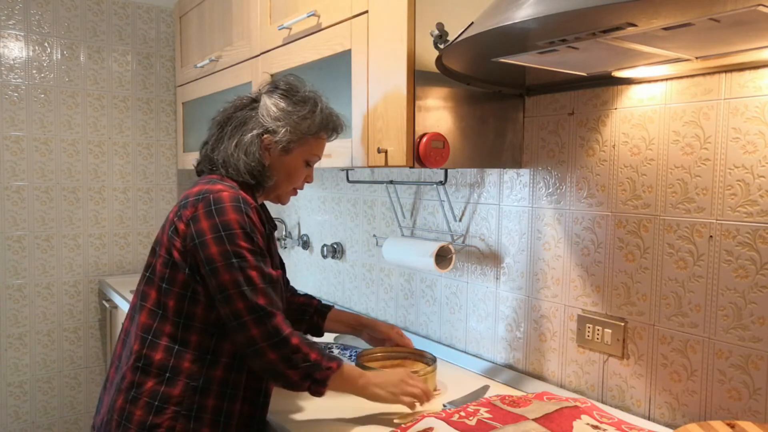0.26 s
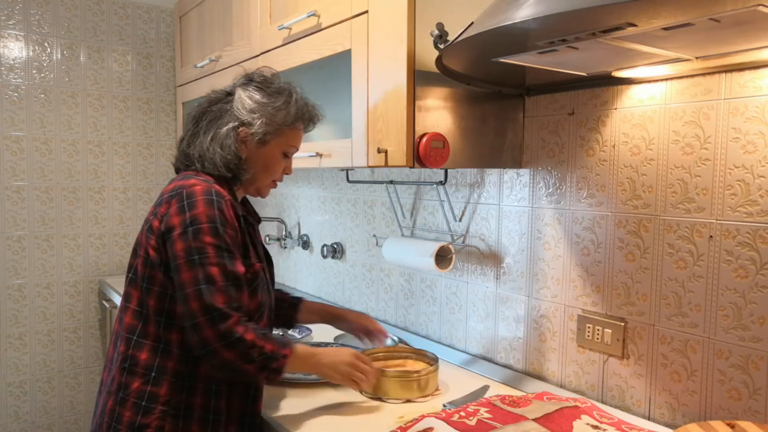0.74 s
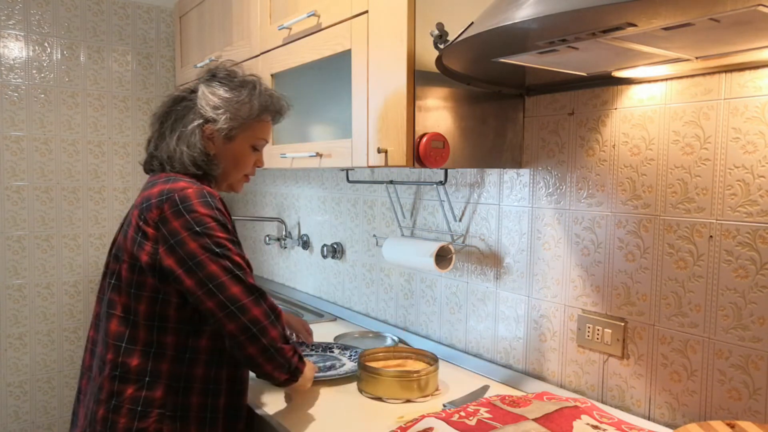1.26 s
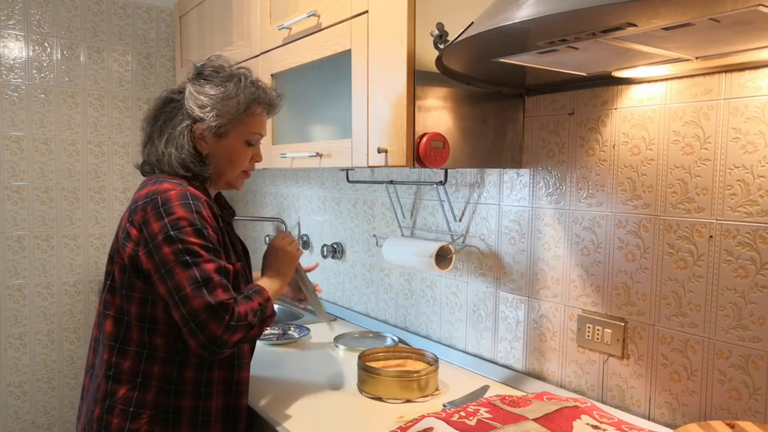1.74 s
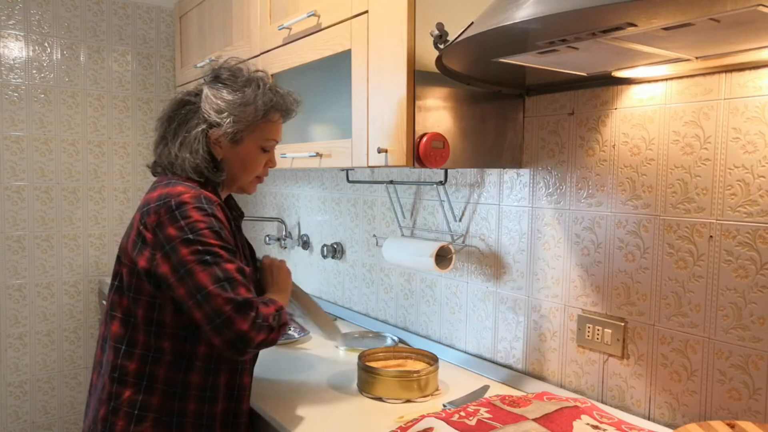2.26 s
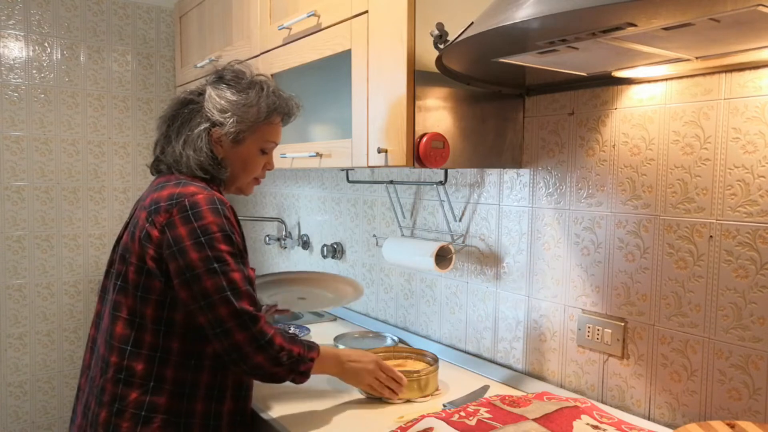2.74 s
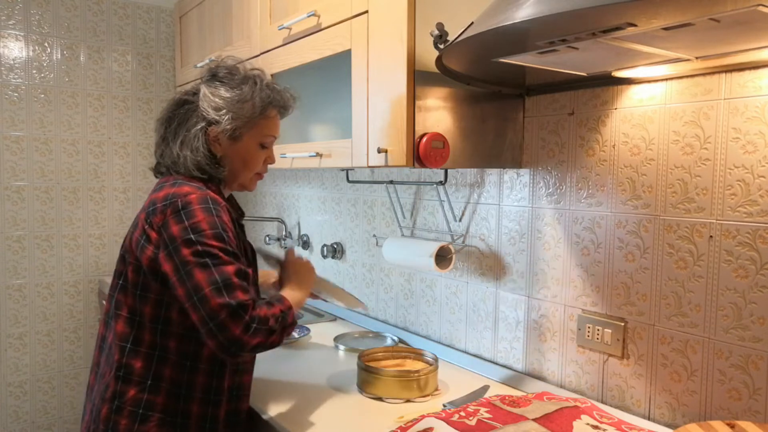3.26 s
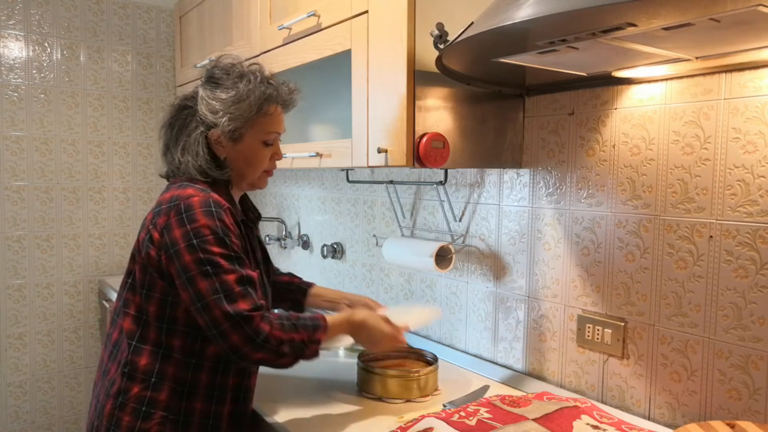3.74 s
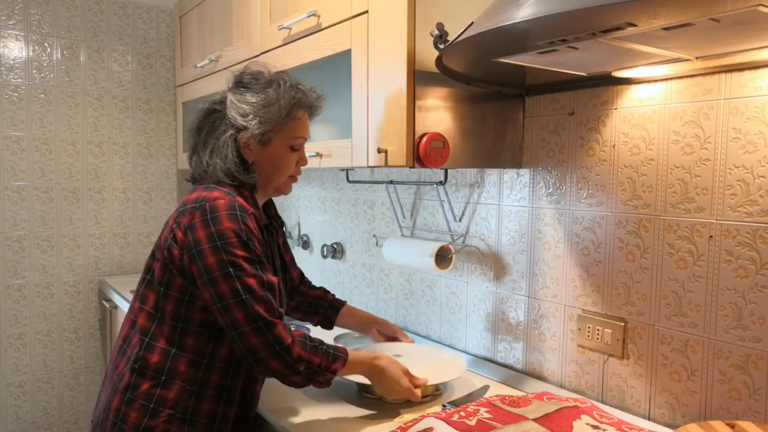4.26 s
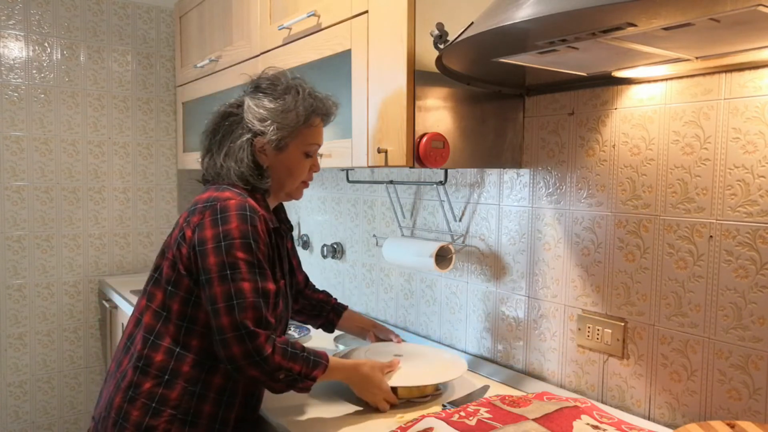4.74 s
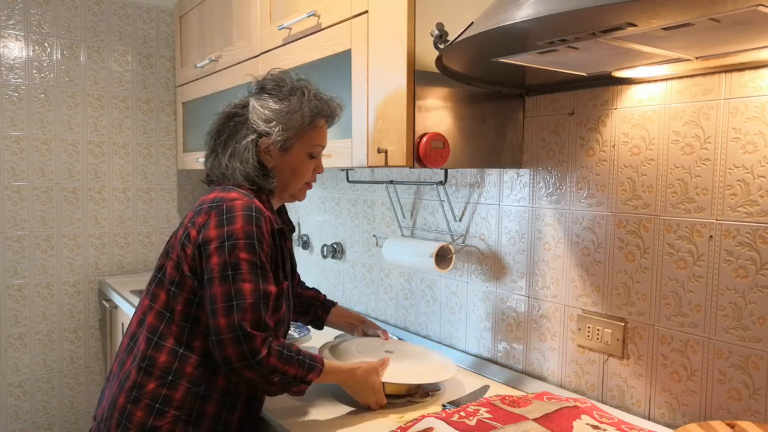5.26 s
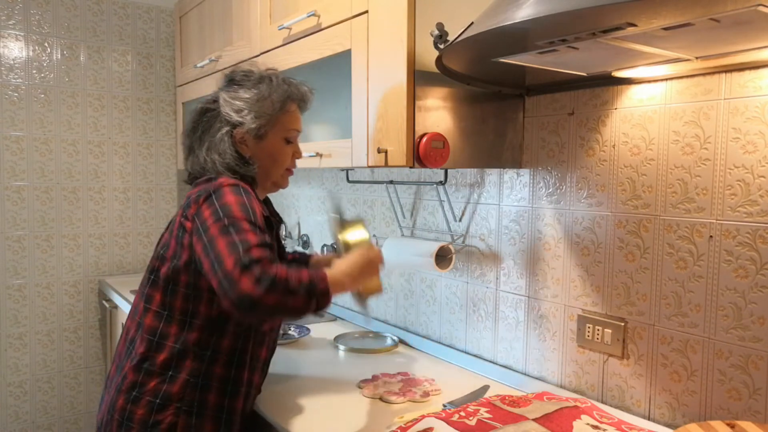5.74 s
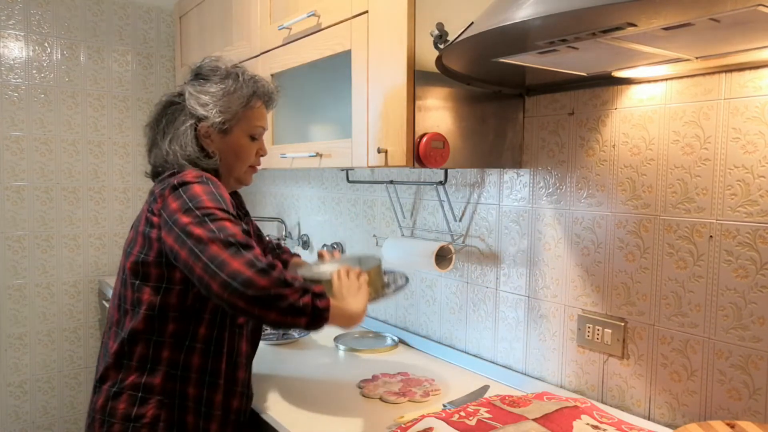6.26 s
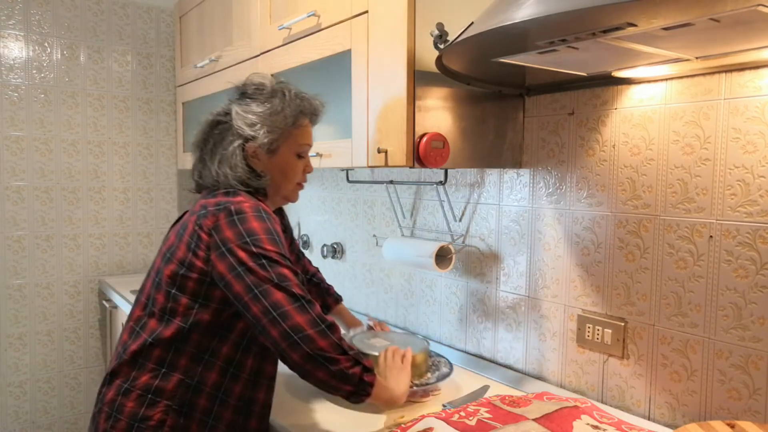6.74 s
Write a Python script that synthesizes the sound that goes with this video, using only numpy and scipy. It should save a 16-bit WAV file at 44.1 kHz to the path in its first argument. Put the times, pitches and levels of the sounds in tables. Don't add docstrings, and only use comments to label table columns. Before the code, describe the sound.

A small tiled kitchen, picked up by two spaced microphones, with faint house rumble, soft street wash and a little hiss beneath. At 0 s a tin mould knocks the counter in a tight metallic rattle, repeated at 0.2 s; faint clicks follow at 0.5-0.9 s. From about 1 s glazed ceramic rubs in short gritty pulls, rising into a loud, hard plate clack at 1.45 s with small ringing rebounds until 1.75 s. From 1.8 to 3.4 s only very light ceramic touches ring. At 4.2-4.3 s the plate seats on the mould with two dull clanks and a low cabinet boom, then a dry knock near 4.5 s. Finger clicks come at 5.03 s, a bright knock at 5.4 s, a snapping rattle at 5.6 s, handling knocks at 5.8 and 6.15 s, a ringing clunk at 6.37 s, a click at 6.65 s. A hard landing strikes at 7 s, where it ends.

```python
import sys
import numpy as np
from scipy import signal
from scipy.io import wavfile
from scipy.ndimage import uniform_filter1d

SR = 44100
rng = np.random.default_rng(int(sys.argv[2]) if len(sys.argv) > 2 else 0)


def voltage_ratio(level):
    return 10 ** (np.asarray(level, float) / 20)


def transcribe(u):
    v = np.clip(np.atleast_2d(u).T, -1, 1)
    q = np.round(v * 32767).astype(np.int16)
    wavfile.write(sys.argv[1], SR, q)


N = 308700

# start in seconds, blow level in dB, hardness (above 4 kHz) in dB, ring level in dB,
# share of the ring time [ratio] left by the hand.
TIN_HITS = [
    (0.001, -21.5, -15, -12, 0.16),
    (0.044, -23, -0.5, 0.5, 0.24),
    (0.069, -23.5, -43, -22, 0.31),
    (0.105, -25, -10, -24, 0.74),
    (0.132, -42, -12, -7, .4),
    (.19, -26.5, -13, -3, 0.69),
    (0.201, -22, -6, 1.5, 0.17),
    (0.216, -25.5, -12, -14.5, 0.63),
    (0.258, -40.5, -40, 7.5, 0.44),
    (0.298, -63, -39, -3, 0.31),
]
PLATE_HITS = [
    (1.451, -6.5, -21.5, -2, 0.36),
    (1.463, -30.5, -13, -10, 0.4),
    (1.473, -22.5, -31.5, -30, 0.2),
    (1.496, -32.5, -17, 15, 0.5),
    (1.518, -38, -10, 12, 0.14),
    (1.585, -44, -10.5, 20.5, 0.28),
    (1.65, -41, -28, 14, 0.14),
    (1.69, -44.5, -26, 6, 0.51),
    (1.745, -44.5, -28, 9, 0.62),
]
TOUCH_HITS = [
    (2.031, -57, -12, 6, 0.4),
    (2.103, -45.5, 1.5, 0, 0.47),
    (2.148, -58.5, 5, 6.5, 0.67),
    (2.496, -55.5, 1.5, 7.5, 0.69),
    (2.759, -61.5, 9.5, -0.5, .6),
    (2.941, -56, 0.5, 0, 0.47),
    (3.18, -57.5, 2.5, 9.5, 0.3),
    (3.254, -54.5, 4.5, 3.5, 0.48),
    (3.421, -54.5, -14.5, 0, 0.82),
]
FREE_HITS = [
    (1.758, -55, -14, 16.3, .8),
    (1.84, -60.5, -24.5, 15.2, 0.86),
    (1.9, -68, -25, 21, 0.73),
    (3.262, -65.5, -20, 9, 0.53),
]
SEATED_HITS = [
    (4.191, -27, -9, 6.3, 0.23),
    (4.213, -44.5, -28, 2.5, 0.46),
    (4.249, -33, -48, 2.2, 0.085),
    (4.277, -29, -11, 3, 0.22),
    (4.306, -41.5, -34, 3.1, 0.22),
    (4.349, -53, -26, 6.4, 1),
]
GRIP_HITS = [
    (5.029, -39, -4, 4.2, 0.17),
    (5.047, -48, -13, 3, .5),
    (5.066, -53.5, 2, 6, 0.45),
    (5.092, -66, -6.5, 2.7, .5),
]
FLIP_HITS = [
    (5.582, -38.5, 1, 4.5, 0.29),
    (5.595, -50, -5, 0.5, 0.3),
    (5.607, -39.5, 1.5, 3.5, 0.51),
    (5.628, -44, -9, -17, 0.59),
    (5.648, -52, -2, 1, 0.42),
]
PAIR_HITS = [
    (6.373, -33.5, -8, 5.4, 0.29),
    (6.39, -42, 5.5, 0.081, 0.14),
    (6.415, -44.5, -40.5, 2.4, 0.28),
]
LANDING_HITS = [
    (6.9955, -12.5, -16, 4.1, 0.71),
]
# start in seconds, blow level in dB, hardness in dB, ring level in dB,
# pitch of the held body in Hz.
KNOCKS = [
    (1.334, -55.5, -35, 13, 1580),
    (4.467, -48, -9, -20, 2420),
    (4.498, -59, 1, 2, 2440),
    (5.382, -46.5, 5, 3.5, 1940),
    (5.803, -48.5, -0.5, -0.5, 2440),
    (6.155, -42.5, 2, -5.5, 2420),
    (6.653, -47, 6, -7.5, 1513),
    (0.512, -53, 8.5, -9, 1900),
    (0.639, -47.5, -11.5, -16, 1900),
    (0.9, -64, 16, -23, 2015),
]

# level in dB, t60 in seconds.
TIN_HZ = [1007, 1750, 2051, 2422, 2665, 2850, 2912, 3505, 4554, 5500, 5540, 6255, 7251, 9152]
TIN_MODES = [(9, 0.22), (2.5, 0.27), (11, 0.098), (8, 0.098), (-22, 0.17), (-8, 0.8), (7.5, 0.79),
             (8, 0.089), (0.5, 0.14), (6, 0.27), (-29, 0.15), (1.5, 0.088), (-32, .2), (0, 0.21)]
PLATE_HZ = [861, 1110, 1275, 1357, 1479, 1486, 1771, 2217, 2395, 2449, 2472, 2559, 2918, 3202, 3757, 4062,
            4436, 5204, 5510, 5930, 7246, 7682, 8678]
PLATE_MODES = [(-15.5, 1.4), (-11, 0.73), (-14, 0.22), (-17.5, 0.28), (6.5, 0.82), (-0.5, 0.48),
               (-8.5, 1.5), (-14, 0.67), (-12, 1.5), (-6, 0.56), (2, 0.46), (-19.5, 0.4), (-15.5, 0.43),
               (-1.5, 0.62), (-9.5, 0.46), (-11.5, 0.65), (-9.5, 0.29), (-10.5, 0.2), (-17.5, 0.51),
               (-11.5, 0.3), (-18.5, 0.4), (-17, 0.36), (-22.5, 0.15)]
TOUCH_HZ = [861, 1479, 2217, 2395, 2449, 3074, 3202, 4055, 5319, 7197]
TOUCH_MODES = [(-6.5, 0.63), (-3, 0.55), (-4.5, 0.35), (-2.5, .5), (-4, 0.58), (-7, 0.25), (-4.5, 0.27),
               (-16, 0.087), (-10, 0.095), (-8.5, 0.11)]
FREE_HZ = [863, 1484, 1771, 2215, 2500, 3203, 3768, 4075]
FREE_MODES = [(3.5, 0.69), (2, 0.51), (4.5, 0.29), (-7, 0.26), (-1.5, 0.37), (-4, 0.27), (-12, .3),
              (-14, .3)]
SEATED_HZ = [355, 458, 860, 970, 1545, 1493, 1696, 2436, 2467, 3202, 3757, 5308, 7822]
SEATED_MODES = [(-27, 0.25), (-1.5, 0.54), (5.5, 0.64), (9, 0.1), (2.5, 0.25), (4.5, 0.57), (-17, 0.16),
                (-4, 0.57), (7, 0.65), (-19, 0.2), (-5, 0.25), (-2, 0.076), (-5, 0.048)]
GRIP_HZ = [1200, 1750, 1848, 1945, 2789, 2983, 3021, 3450, 4990, 5965, 6923]
GRIP_MODES = [(0, 0.058), (-21.5, 0.082), (-2, 0.16), (-0.5, 0.19), (-9, .1), (-15, 0.146), (-0.5, 0.14),
              (-8, 0.067), (-22, .05), (-8, 0.088), (-20, .05)]
FLIP_HZ = [1240, 1491, 1545, 1879, 1965, 2444, 2778, 3187, 3400, 3747, 5642, 7014, 8705]
FLIP_MODES = [(-7.5, 0.12), (1.5, 0.071), (-4.5, 0.11), (-3, 0.09), (2.5, .08), (-1, 0.161), (-7, 0.12),
              (-5.5, 0.143), (-4, 0.051), (-6, 0.076), (-19, .1), (-11, 0.058), (-5, 0.05)]
PAIR_HZ = [560, 883, 1120, 1190, 1244, 1868, 2266, 2939, 4150, 3500, 4624, 6815]
PAIR_MODES = [(1.5, 0.39), (-2.5, 1), (-2, 0.52), (-0.5, 0.5), (-11, 0.38), (-14, 0.22), (8, 0.12),
              (3, 0.089), (-8, 0.04), (1, 0.051), (-4.5, 0.053), (-16, 0.12)]
LANDING_HZ = [920, 1750, 1950, 3400, 4050, 5700, 7300]
LANDING_MODES = [(-8, .1), (2.5, 0.042), (-3.5, 0.038), (-31, .1), (-15, 0.087), (-7, 0.059), (-8.5, 0.036)]
RIM_HZ = [1507, 2326, 2509, 3741, 5184, 5938, 6831, 7935, 8651, 9593, 10540]
RIM_MODES = [(-14.5, .3), (-5, 0.23), (-3.5, 0.24), (-3.5, 0.4), (-3, 0.21), (-3, 0.18), (-13, 0.18),
             (-3.5, 0.2), (-4, 0.17), (-1.5, 0.66), (-6.5, 0.21)]

# start in seconds, length in seconds, first level in dB, last level in dB,
# hardness in dB.
SLIDES = [
    (0.965, 0.065, -54.5, -66, -2.5),
    (1.025, 0.11, -52, -57, -20),
    (1.17, 0.07, -59, -62, -14.5),
    (1.268, 0.12, -59.5, -53, -26.5),
    (1.393, 0.044, -48, -37, 1),
]
# start in seconds, length in
# seconds, # first level in dB, last level in dB, hardness in dB.
RUBS = [(1.172, .06, -64, -68, 4), (1.03, .1, -66, -66, 3), (4.195, .07, -50, -55, -6),
        (4.275, .11, -47, -60, -6), (.045, .09, -50, -58, 0), (.2, .12, -49, -60, 0),
        (1.455, .1, -36, -48, 0), (6.375, .08, -52, -60, -3), (5.03, .05, -56, -64, 3),
        (.515, 0.088, -56.5, -72, 5.5), (.590, 0.27, -66.5, -76.5, 8), (1.560, 0.23, -50, -56, -12),
        (4.445, 0.063, -63.5, -50, -5.5), (4.505, .07, -56, -66, -3), (5.101, 0.25, -68, -70, 7),
        (5.499, 0.063, -63.5, -52.5, 1), (5.585, 0.069, -61.5, -76, -16), (5.810, .25, -68, -74, 7),
        (6.159, 0.16, -61, -75.5, 9.5)]
# start in seconds, level in dB, pitch in Hz, t60 in seconds.
THUDS = [(.01, -36, 122, 0.037), (.2, -47.5, 210, 0.062), (.045, -38.5, 225, 0.037),
         (1.05, -41.5, 490, 0.026), (1.09, -55.5, 710, 0.029), (1.13, -53, 273, 0.047),
         (1.29, -40, 302, 0.021), (1.365, -39.5, 246, 0.12), (1.453, -14.5, 714, 0.04),
         (1.452, -21.5, 526, 0.031), (1.455, -32, 406, 0.078), (1.455, -22.5, 92.3, 0.027),
         (2.17, -51.5, 193, 0.087), (3.255, -45, 377, 0.039), (3.256, -45, 524, 0.05),
         (3.27, -41.5, 850, 0.064), (4.195, -34, 74, 0.088), (4.22, -38.5, 358, 0.096),
         (4.24, -36, 157, 0.051), (4.28, -43, 91, 0.087), (4.3, -28, 237, 0.016),
         (5.035, -40.5, 106, 0.063), (5.05, -43, 154, .04), (.05, -38.5, 750, 0.042),
         (.205, -29.5, 836, 0.052), (.12, -45, 695, .05), (1.452, -25, 1094, 0.05),
         (5.385, -50.5, 392, 0.12), (5.6, -43, 193, 0.041), (6.2, -45, 212, 0.083), (6.26, -42, 436, 0.07),
         (6.3, -47.5, 329, 0.066), (6.28, -51.5, 100, 0.1), (6.38, -30, 485, 0.026),
         (6.997, -13, 207, 0.061), (2.162, -53, 116, 0.085), (2.165, -53, 236.4, .08),
         (2.19, -56, 168, .08)]
# start in seconds, level in dB.
SNAPS = [
    (5.582, -25.5),
    (5.6, -35.5),
    (6.653, -32.5),
    (6.995, -13.5),
    (.045, -45),
    (.2, -46),
]

# frequency in Hz, t60 in seconds.
KITCHEN_T60 = [(60, 0.75), (160, 0.61), (420, 0.55), (1100, 0.58), (2910, 0.51), (7680, 0.29)]
# frequency in Hz, likeness [-1..1].
TAIL_LIKENESS = [(60, 1), (150, .985), (350, .72), (700, -.7), (1400, .1), (2800, -.05), (8000, -.1)]
AIR_LIKENESS = [(60, 1), (150, 0.73), (350, -0.073), (700, -0.24), (1400, -0.21), (2800, 0.29),
                (8000, 0.12)]
# frequency in Hz, gain in dB.
MICROPHONE_DB = [(20, -6.5), (60, 7.5), (1000, -2.5), (5000, -3.5), (9000, -9), (11000, -18),
                 (12000, -25.5), (14000, -28.5), (16000, -23)]

# start in seconds, swell in seconds, hold in seconds, level in dB, pitch in Hz.
BOOMS = [(0, 0.0064, 0.028, -45, 48.4), (0.142, 0.045, 0.12, -52, 47), (1.442, 0.025, 0.17, -47.5, 46.2),
         (1.966, 0.057, 0.045, -64.5, 45.34), (2.137, 0.048, 0.055, -67.5, 45),
         (2.311, 0.028, 0.18, -69, 46.5), (3.397, 0.45, 0.33, -60, 44), (4.196, 0.03, 0.092, -39.5, 48.9),
         (4.271, 0.07, 0.015, -32, 48), (4.46, 0.051, 0.013, -59, 45.3), (4.593, 0.095, 0.48, -59, 39.6),
         (5.038, 0.044, 0.081, -53.5, 49.6), (5.671, 0.065, 0.17, -64.5, 40.1),
         (6.685, 0.16, .1, -66.5, 45.3)]
# frequency in Hz, density in dB per Hz.
STREET_SPECTRUM = [(180, -29.5), (300, -4), (641, -1), (795, 3.5), (1110, 4), (1220, 2), (1820, 0),
                   (4290, -15), (5400, -18.5), (9170, -29), (15600, -37.5)]
RUMBLE_SPECTRUM = [(12, -31), (20, -0.5), (64, -13.5), (97, -15.5), (232, -10.5), (431, -22), (500, -25.5),
                   (650, -56), (1100, -120)]
HISS_SPECTRUM = [(100, -10), (2000, 5.5), (9000, -3), (13000, -14.5), (15500, -7)]
# time in seconds, wash level in dB.
STREET_LEVEL = [
    (0, -68.5),
    (.7, -74),
    (1.201, -69.5),
    (3.1, -69.5),
    (3.9, -65.5),
    (5.297, -65.5),
    (7, -69),
]

TIN_CLACK_HZ, PLATE_CLACK_HZ, SEATED_CLACK_HZ = 2250, 1700, 1087
PAIR_CLACK_HZ, KNOCK_CLACK_HZ, GRIP_CLACK_HZ = 1270, 2610, 2430
FLUTTER_PER_S, FLUTTER_DB, FLUTTER_RAD = 30, 3.5, .7
SLIDE_HZ, SLIDE_HZ_PER_DB, RIM_DB, RIM_PER_DB = 1900, 56.5, 10, 0.6
RUB_HZ, RUB_RIM_DB = 1900, -29
RIM_LEFT = .3
SNAP_HZ, SNAP_S = 10500, 0.041
SWELL_DB, BOOM_FALL_DB_PER_S, BOOM_REST_DB = 19.5, 261, -84.5
HISS_DB, RUMBLE_DB, RUMBLE_FOLLOWS = -78, -70, 0.24
LEFT_LAG = 26
QUIET_CUT_DB, OPEN_DB, SLOPE = 9, -44, .6


def evened(x):
    return x / np.sqrt(np.mean(x ** 2) + 1e-20)


def read(points, hz):
    f, value = np.transpose(points)
    return np.interp(np.log(hz + 1), np.log(f + 1), value)


def add(mix, s, sound):
    part = mix[round(s * SR):][:len(sound)]
    part += sound[:len(part)]


def contacts():
    near, middle, far = spots = np.zeros((3, N))
    for spot, hits, clack_hz, modes_hz, modes, chatter_s in (
            (near, TIN_HITS, TIN_CLACK_HZ, TIN_HZ, TIN_MODES, .008),
            (middle, PLATE_HITS, PLATE_CLACK_HZ, PLATE_HZ, PLATE_MODES, .004),
            (near, SEATED_HITS, SEATED_CLACK_HZ, SEATED_HZ, SEATED_MODES, .005),
            (far, PAIR_HITS, PAIR_CLACK_HZ, PAIR_HZ, PAIR_MODES, .004),
            (middle, TOUCH_HITS, PLATE_CLACK_HZ, TOUCH_HZ, TOUCH_MODES, .004),
            (near, GRIP_HITS, GRIP_CLACK_HZ, GRIP_HZ, GRIP_MODES, .004),
            (far, FLIP_HITS, GRIP_CLACK_HZ, FLIP_HZ, FLIP_MODES, .006),
            (near, LANDING_HITS, GRIP_CLACK_HZ, LANDING_HZ, LANDING_MODES, .003)):
        for s, db, hard_db, ring_db, left in hits:
            ring = ringing(modes_hz, modes, hard_db + 28.5, left)
            add(spot, s, strike(db, clack_hz, hard_db, ring_db, ring, chatter_s))
    for s, db, hard_db, ring_db, left in FREE_HITS:
        ring = ringing(FREE_HZ, FREE_MODES, left=left)
        add(far, s, strike(db, PLATE_CLACK_HZ, hard_db, ring_db, ring, .004))
    for k, (s, *rest) in enumerate(KNOCKS):
        add(spots[k % 3], s, knock(*rest))
    for row in SLIDES:
        hard_db = row[-1]
        add(middle, *stroke(*row, SLIDE_HZ + SLIDE_HZ_PER_DB * hard_db, RIM_DB + RIM_PER_DB * hard_db))
    for row in RUBS:
        add(middle, *stroke(*row, RUB_HZ, RUB_RIM_DB))
    for k, (s, *rest) in enumerate(THUDS):
        add(spots[k % 3], s, thud(*rest))
    for s, db in SNAPS:
        add(near, s, snap(db))
    return spots


def strike(db, clack_hz, hard_db, ring_db, ring, chatter_s):
    t = np.arange(SR // 10) / SR
    force = rng.standard_normal(len(t)) ** 3 * np.exp(-t / chatter_s)
    force[0] += 14
    crack = clack(force, clack_hz, 2364) + voltage_ratio(hard_db + 4.0) * edge(force)
    crack = signal.lfilter(*signal.butter(1, 140, "high", fs=SR), crack)
    onset = np.clip(np.arange(len(ring)) / SR / 0.00049, 0, 1)
    out = voltage_ratio(ring_db - 5.5) * ring * onset
    add(out, 0, crack * voltage_ratio(-14.5))
    return voltage_ratio(db) * out


def clack(x, hz, width_hz):
    turn = np.exp(2j * np.pi * np.cumsum(hz * np.ones(len(x))) / SR)
    r = np.exp(-np.pi * width_hz / SR)
    smooth = signal.lfilter([1], np.convolve([1, -r], [1, -r]), x / turn)
    return evened((turn * smooth).real)


def edge(x):
    return evened(signal.sosfilt(signal.butter(2, (3500, 11500), "band", fs=SR, output="sos"), x))


def ringing(hz, modes, hard_db=0, left=1):
    hz = np.array(hz)[:, None]
    db, t60 = np.transpose(modes)[:, :, None]
    t60 = t60 * np.clip(left, .03, 2)
    t = np.arange(int(SR * np.clip(t60.max(), .12, .85))) / SR
    db = db + 0.11 * hard_db * np.log2(hz / 2000) + 2 * rng.standard_normal(hz.shape)
    swing_db, swing_rad = flutter(2 * len(hz), t).reshape(2, len(hz), -1)
    level = voltage_ratio(db - 60 * t / t60 + FLUTTER_DB * swing_db)
    x = (level * np.sin(2 * np.pi * hz * t + FLUTTER_RAD * swing_rad)).sum(0)
    return x / np.sqrt(np.mean(x[:1000] ** 2))


def flutter(count, t):
    steps = t * FLUTTER_PER_S
    knots = rng.standard_normal((count, FLUTTER_PER_S))[:, :int(steps[-1]) + 2]
    return knots @ np.clip(1 - abs(steps - np.arange(knots.shape[1])[:, None]), 0, 1)


def knock(db, hard_db, ring_db, body_hz):
    modes_hz = [body_hz, 1.17 * body_hz, 2.1 * body_hz]
    held = ringing(modes_hz, [(2.5, 0.02), (-3.5, .018), (-21, 0.012)])
    return strike(db, KNOCK_CLACK_HZ, hard_db, ring_db, held, 0.0062)


def stroke(start, length, from_db, to_db, hard_db, hz, ring_db):
    return slide([(start, from_db, hz, hard_db, ring_db), (start + length, to_db, hz, hard_db, ring_db)])


def slide(rows):
    s, *columns = np.transpose(rows)
    t = np.arange(s[0], s[-1], 1 / SR)
    db, hz, hard_db, ring_db = (np.interp(t, s, c) for c in columns)
    grit = rng.standard_normal(len(t)) * voltage_ratio(2.6 * rng.exponential(1, len(t)))
    rim = evened(signal.fftconvolve(grit, ringing(RIM_HZ, RIM_MODES, left=RIM_LEFT))[:len(t)])
    rub = clack(grit, hz, 1500) + voltage_ratio(hard_db - 2.5) * edge(grit) + voltage_ratio(ring_db) * rim
    return s[0], voltage_ratio(db + 3.0) * rub * signal.windows.tukey(len(t), .02)


def thud(db, hz, t60):
    t = np.arange(SR // 4) / SR
    return voltage_ratio(db + 0.5 - 60 * t / t60) * np.sin(2 * np.pi * hz * t) * np.clip(t * hz / 0.39, 0, 1)


def snap(db):
    t = np.arange(SR // 10) / SR
    fizz = rng.standard_normal(len(t)) * np.exp(-t / SNAP_S)
    return voltage_ratio(db) * signal.sosfilt(signal.butter(3, SNAP_HZ, "high", fs=SR, output="sos"), fizz)


def paired(same, shape):
    a, b, c, d = rng.standard_normal(shape + (4,)).T
    same = np.clip(same, -1, 1)[:, None]
    left = a + 1j * b
    return np.array([left, same * left + np.sqrt(1 - same ** 2) * (c + 1j * d)])


def kitchen():
    hz, t = np.fft.rfftfreq(512, 1 / SR), np.arange(330) * 128 / SR
    decay = voltage_ratio(-60 * t / read(KITCHEN_T60, hz)[:, None])
    z = paired(read(TAIL_LIKENESS, hz), (len(t), len(hz))) * decay
    tail = signal.istft(z, nperseg=512, noverlap=384)[1]
    tail = tail * np.clip((np.arange(tail.shape[1]) / SR - .002) / 0.0015, 0, 1)
    return tail / np.linalg.norm(tail[0])


def boom():
    drift = 0.5 * np.cumsum(evened(uniform_filter1d(rng.standard_normal(N), 3000))) / SR
    out = voltage_ratio(BOOM_REST_DB) * np.sin(2 * np.pi * (46 * np.arange(N) / SR + 3 * drift))
    for s, swell_s, hold_s, db, hz in BOOMS:
        turns = drift[round(s * SR):][:SR]
        u = np.arange(len(turns)) / SR
        rise_db = -SWELL_DB * np.clip(1 - u / swell_s, 0, 1)
        fall_db = BOOM_FALL_DB_PER_S * np.maximum(u - swell_s - hold_s, 0)
        add(out, s, voltage_ratio(db + rise_db - fall_db) * np.sin(2 * np.pi * (hz * u + turns - turns[0])))
    return out


def background():
    hz, frames, t = np.fft.rfftfreq(2048, 1 / SR), N // 512 + 5, np.arange(N) / SR
    s, wash_db = np.transpose(STREET_LEVEL)
    rumble_db = RUMBLE_DB + RUMBLE_FOLLOWS * (wash_db - wash_db.mean())
    hiss_db = HISS_DB + 0 * s
    patches = uniform_filter1d(rng.standard_normal((len(hz), frames)), 20, 0)
    patches = evened(uniform_filter1d(patches, 6, 1))
    out = np.zeros((2, N))
    for colour, db in ((STREET_SPECTRUM, wash_db), (RUMBLE_SPECTRUM, rumble_db), (HISS_SPECTRUM, hiss_db)):
        z = paired(read(AIR_LIKENESS, hz), (frames, len(hz))) * voltage_ratio(read(colour, hz)[:, None] + 2.0 * patches)
        noise = signal.istft(z, nperseg=2048, noverlap=1536)[1][:, :N]
        out += voltage_ratio(np.interp(t, s, db)) * evened(noise)
    return out


def suppressor(x):
    bright = signal.sosfilt(signal.butter(1, 300, "high", fs=SR, output="sos"), x.mean(0))
    power_db = 10 * np.log10(abs(uniform_filter1d(bright ** 2, 300)) + 1e-12)
    fall = np.arange(N) * 300. / SR
    held_db = np.maximum.accumulate(power_db + fall) - fall
    cut_db = np.clip(SLOPE * (OPEN_DB - held_db), 0, QUIET_CUT_DB)
    return x * voltage_ratio(-uniform_filter1d(cut_db, 100))


def scene():
    tails, air, cabinet = [kitchen() for _ in range(3)], background(), boom()
    spots = contacts()
    dry = spots.sum(0)
    direct = np.array([np.pad(dry, (LEFT_LAG, 0))[:N] * voltage_ratio(-0.35), dry])
    wet = sum(signal.oaconvolve(x[None], tail, axes=1)[:, :N] for x, tail in zip(spots, tails))
    heard = voltage_ratio(-5.5) * direct + voltage_ratio(0.5) * wet * voltage_ratio([[-.5], [.5]])
    hz = np.linspace(0, SR / 2, 513)
    colour = signal.firwin2(1023, hz, voltage_ratio(read(MICROPHONE_DB, hz)), fs=SR)
    coloured = signal.oaconvolve(heard, colour[None], "same", axes=1)
    return suppressor(coloured + voltage_ratio(QUIET_CUT_DB) * air) + cabinet


def band_limit(x):
    return signal.sosfilt(signal.butter(12, 15710, fs=SR, output="sos"), x)


def record(dry):
    ceiling = .9
    mix = ceiling * np.tanh(dry / ceiling)
    return band_limit(mix)


dry = scene()
out = record(dry)
transcribe(out)
```